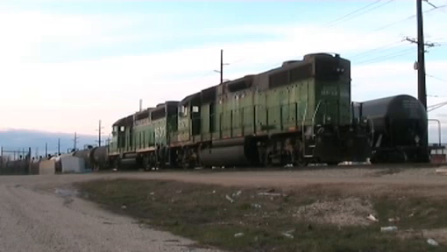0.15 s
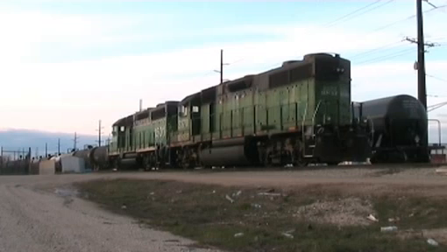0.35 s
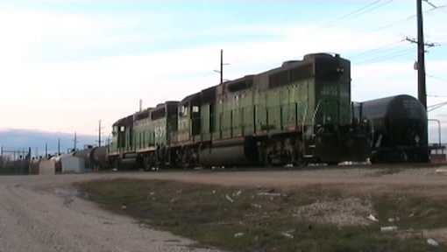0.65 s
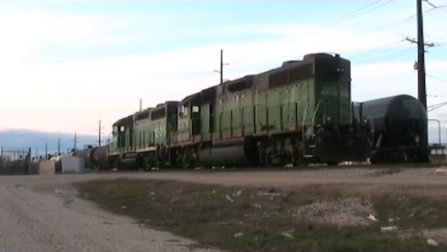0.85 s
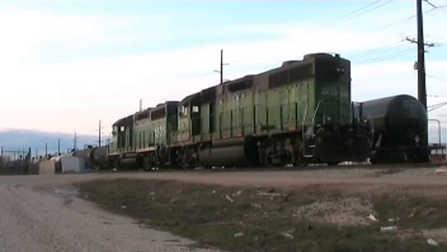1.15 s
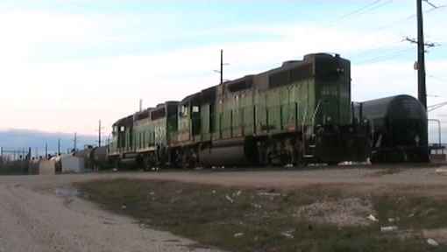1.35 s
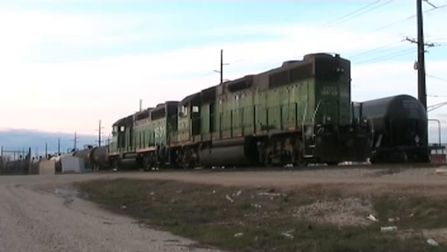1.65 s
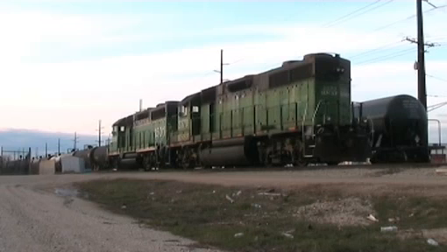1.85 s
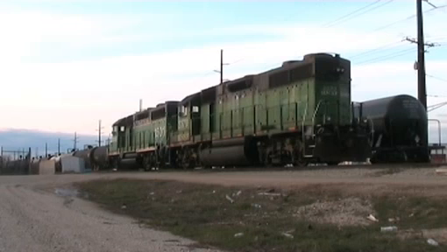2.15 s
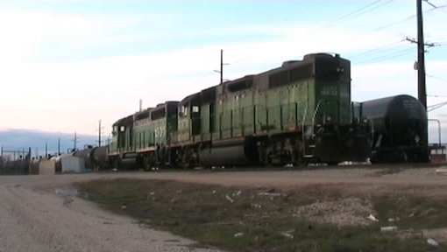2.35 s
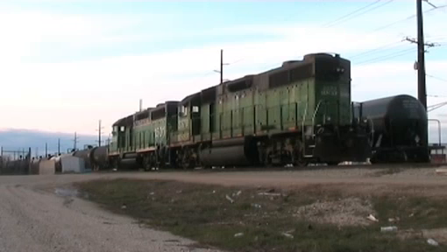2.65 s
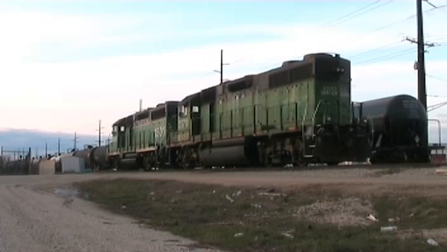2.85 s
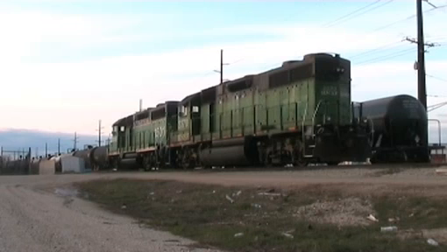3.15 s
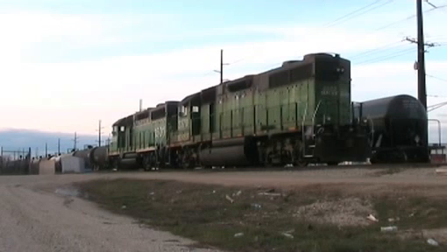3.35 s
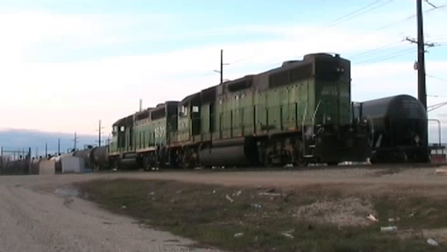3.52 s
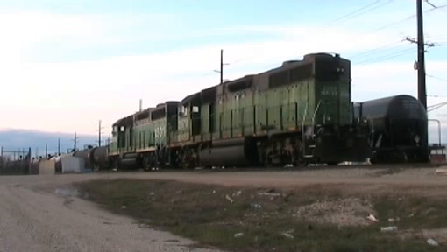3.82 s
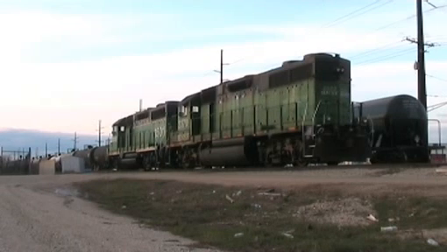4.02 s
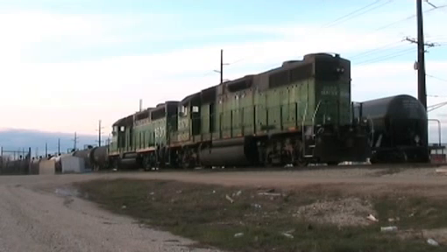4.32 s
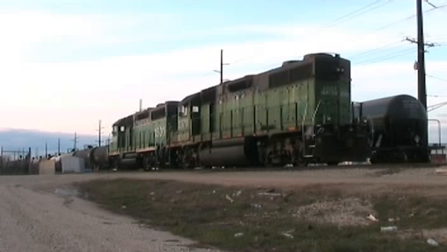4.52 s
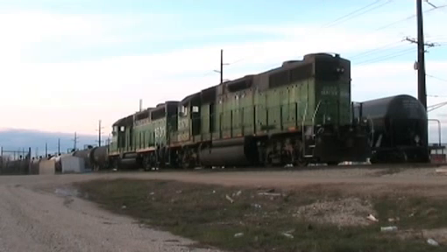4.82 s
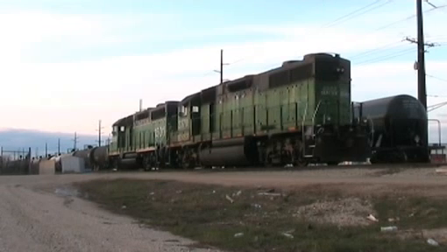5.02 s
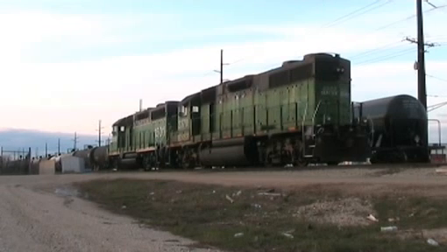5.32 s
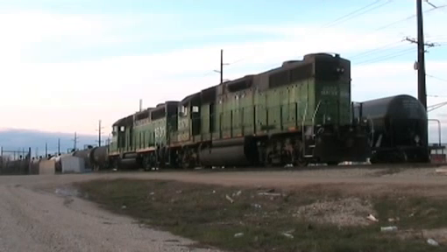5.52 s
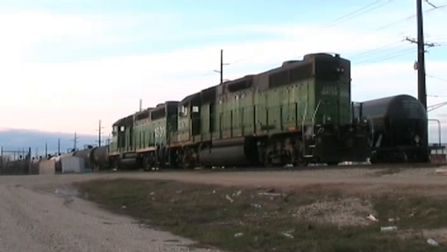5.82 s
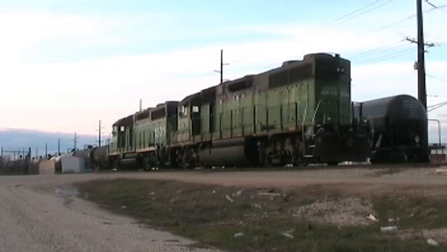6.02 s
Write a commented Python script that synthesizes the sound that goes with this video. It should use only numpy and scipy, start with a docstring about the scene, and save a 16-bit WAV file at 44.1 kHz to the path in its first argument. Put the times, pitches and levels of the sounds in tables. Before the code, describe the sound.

Two diesel locomotives idle in a rail yard, a deep throbbing chug with rattling valves, hood knocks, faint whine and low wind buffeting.

```python
"""Two two-stroke diesel locomotives idle in a rail yard at slightly different speeds, so shared tones beat slowly.
Crank-locked patterns repeat exhaust chug, hood knocks and valve clatter; shaft multiples sum to a throbbing boom.
Shaped noise makes the swelling hiss, one very short click and two fading puffs; unsteady sines make the
blower's thin whine. Gusts of low noise push two microphone ports against each other; twice the low sound
snaps to the middle and slowly spreads again."""
import sys
import numpy as np
from scipy.fft import rfft, irfft, next_fast_len
from scipy.io import wavfile
from scipy.ndimage import map_coordinates

SR = 44100
rng = np.random.default_rng(int(sys.argv[2]) if len(sys.argv) > 2 else 0)


def master_out(mix):
    """Clip the mix to full scale and print it as 16-bit PCM to the path in sys.argv[1]."""
    frames = np.transpose(np.atleast_2d(mix))
    ceiling = np.clip(frames, -1, 1)
    pcm = np.round(ceiling * 32767).astype(np.int16)
    wavfile.write(sys.argv[1], SR, pcm)


N = 272097

NEAR_TURNS = 5.303  # mean crankshaft turns a second
CYLINDERS = 16
# Slow drift of the engines' loudness. Each row: time in seconds, change in dB.
LOUDNESS_DRIFT = [(0, -1.5), (.6, 0), (1.1, -1), (3.3, -0.5), (4.3, 0.5), (6.17, 1.5)]
# How strongly the hood knocks and hums. Each row: time in seconds, change in dB.
HOOD_STRENGTH = [(0, 1.5), (.5, 0), (1.05, -0.5), (1.9, -1), (3.7, -1), (4.4, 0.5), (5, 1.5), (5.3, -1),
                 (5.9, 2.5), (6.17, 4.5)]


def amp(db):
    """Level is logarithmic: 20 dB is a tenfold amplitude."""
    return 10 ** (np.asarray(db) / 20)


def unit(x):
    """Normalization: x scaled to an rms of 1."""
    return x / np.sqrt(np.mean(x ** 2) + 1e-20)


def along(points, hz):
    """Interpolation of (Hz, value) points on a logarithmic frequency axis."""
    f, v = np.transpose(points)
    return np.interp(np.log(hz + 1), np.log(f + 1), v)


def curve(rows):
    """Linear interpolation of (seconds, dB) points to one value per sample."""
    s, db = np.transpose(rows)
    return np.interp(np.arange(N) / SR, s, db)


def swells(rows):
    """A sum of Gaussian level changes, each row (seconds, half width in seconds, dB)."""
    t = np.arange(N) / SR
    return sum(db * np.exp(-((t - s) / half_width) ** 2) for s, half_width, db in rows)


def wobble(rate):
    """Slow random modulation: a smooth curve through random knots, rate of them a second."""
    knots = rng.standard_normal(int(N * rate / SR) + 4)
    return map_coordinates(knots, [np.arange(N) * rate / SR], mode="nearest")


def filtered(x, response):
    """Linear filtering: the spectrum of x times a response of frequency."""
    m = next_fast_len(N + SR // 2)
    return irfft(rfft(x, m) * response(np.fft.rfftfreq(m, 1 / SR)), m)[..., :N]


def coloured(x, spectrum):
    """Spectral shaping by (Hz, relative dB) points, then scaling to an rms of 1."""
    return unit(filtered(x, lambda hz: amp(along(spectrum, hz))))


def quadrature(phase):
    """Mid and side a quarter cycle apart give a wide but centred tone."""
    return np.sqrt(2) * np.array([np.cos(phase), np.sin(phase)])


def shafts():
    """Beating: the far shaft slips by half a firing, one cycle of the boom, from one in-step moment to the next."""
    # Moments at which the two booms fall in step, in seconds.
    in_step_s = [-.9, .62, 2.15, 3.4, 4.8, 5.97, 7.3]
    far_lead = 5  # cylinders by which the far engine leads at the first of these moments
    hunt = .0005  # relative speed wander that the governor allows
    near = np.cumsum(NEAR_TURNS * (1 + hunt * wobble(4))) / SR
    beats = np.interp(np.arange(N) / SR, in_step_s, np.arange(len(in_step_s)))
    return near, near + (far_lead - beats / 2) / CYLINDERS


def repeating(turn, size=16384):
    """Periodicity: mid and side of a broadband rattle that comes back alike on every turn."""
    pattern = irfft(np.exp(2j * np.pi * rng.random((2, size // 2 + 1))))
    return unit(np.array([map_coordinates(p, [turn % 1 * size], mode="grid-wrap") for p in pattern]))


def firing(turn, depth, uneven_db):
    """Amplitude modulation at the firing rate: one swell per cylinder, each with its own strength."""
    strength = amp(uneven_db * unit(rng.standard_normal(CYLINDERS)))
    stroke = turn * CYLINDERS
    cylinder = np.interp(stroke, np.arange(CYLINDERS), strength, period=CYLINDERS)
    return unit(cylinder * (1 + depth * np.cos(2 * np.pi * stroke)))


def engines(near, far, spectrum, far_db, loose_db, depth, uneven_db):
    """Cyclic noise: both engines' repeating blows, with new turbulence on the near engine at every firing."""
    turbulence = amp(loose_db) * rng.standard_normal((2, N))
    near_blows = (repeating(near) + turbulence) * firing(near, depth, uneven_db)
    far_blows = amp(far_db) * repeating(far) * firing(far, depth, uneven_db)
    return coloured(near_blows + far_blows, spectrum)


def tones(turn, orders, scatter, waver_db):
    """Fourier synthesis from shaft multiples; with little scatter of phase they add up to one throb per turn."""
    out = np.zeros((2, N))
    for order, db in orders:
        phase = 2 * np.pi * order * turn + scatter * rng.uniform(-np.pi, np.pi)
        out += amp(db + waver_db * wobble(10)) * quadrature(phase)
    return out


def rings(turn, rows, rough, uneven_db):
    """Impact sound: short tone bursts at fixed places in the turn, with strength that varies from turn to turn."""
    out = np.zeros((2, N))
    for place, hz, length, db in rows:
        t = ((turn - place + .5) % 1 - .5) / NEAR_TURNS
        phase = 2 * np.pi * hz * t + rough * wobble(1 / length) + rng.uniform(-np.pi, np.pi)
        strength = amp(db + uneven_db * wobble(NEAR_TURNS))
        out += strength * np.exp(-(t / length) ** 2) * quadrature(phase)
    return out


def chug_push(near):
    """Cyclic pressure: a cosine once a turn, at its peak at a fixed place in the turn."""
    return np.cos(2 * np.pi * (near - .74))


def chug_db(near):
    """The once-a-turn level change shared by exhaust and boom; its sign sets the louder half of the turn."""
    return -0.2 * chug_push(near)


def dip():
    """A brief Gaussian dip in level, in dB, heard in exhaust, clatter, ticks and hiss."""
    return swells([(1.98, 0.093, -2)])


def exhaust(near, far):
    """Pulsed turbulence: the exhaust gives broadband noise modulated at the firing rate."""
    # Spectrum of the exhaust. Each row: frequency in Hz, relative level in dB.
    exhaust_spectrum = [(30, -26), (45, -4), (65, -13.5), (90, -6), (150, -7), (175, 3.5), (215, -6),
                        (270, 3), (320, -2), (400, -3), (490, -3), (570, -8.5), (700, -6), (800, -13.5),
                        (1300, -22.5), (3000, -75)]
    noise = engines(near, far, exhaust_spectrum, far_db=-8, loose_db=-8, depth=0.085, uneven_db=-0.5)
    return amp(-22.5 + curve(LOUDNESS_DRIFT) + dip() + chug_db(near)) * noise


def clatter(near, far):
    """Repeated impact: the valves rattle in a higher band, locked to the crank but looser than the exhaust."""
    # Spectrum of the clatter. Each row: frequency in Hz, relative level in dB.
    clatter_spectrum = [(400, -26), (950, -5.5), (1200, 1.5), (1380, 1.5), (1550, -3.5), (1700, 1.5),
                        (2000, -5.5), (2300, -10), (2900, -11.5), (3800, -22), (4600, -23), (6200, -23.5),
                        (8300, -27), (9700, -45.5)]
    noise = engines(near, far, clatter_spectrum, far_db=-8.5, loose_db=-2.5, depth=0.086, uneven_db=1.4)
    return amp(-29.5 + dip()) * noise


def boom(near, far):
    """Interference: phase-aligned stack tones throb in three uneven lumps a turn and beat with the far engine."""
    # Stack tones. Each row: multiple of the shaft speed, relative level in dB.
    stack_orders = [(31, -47), (32, -30.8), (33, -36.5), (35, -35.5)]
    # Surges and stumbles on single turns. Each row: time in seconds, half width in seconds, change in dB.
    surges = [(.155, 0.036, 3), (.25, .04, -10), (.335, 0.022, 1.5), (.42, 0.03, -8), (.48, 0.017, 4),
              (.59, .025, -6.5), (.669, .025, 6), (.82, 0.038, -2), (1.13, .04, -5), (1.29, .03, 2),
              (1.4, 0.035, -11), (1.47, 0.032, 3), (1.57, .03, -4), (1.75, .025, -6), (1.804, 0.026, 3),
              (2.6, .035, 2.5), (2.69, .05, -6), (2.86, .035, -7), (2.93, .025, 4), (3.35, .025, 4),
              (3.45, .03, -5), (3.8, 0.036, -7), (4.02, .035, -9), (4.19, .03, -7), (4.3, .03, 2.5),
              (4.39, .02, -4), (4.58, .025, -4), (4.75, .035, -6), (5.14, 0.04, -11), (5.31, .03, -6),
              (5.49, 0.025, -5), (5.62, .025, 2.5), (5.72, .04, -6)]
    stack_turn = .83  # place in the turn where the tones align
    near_stack = tones(near - stack_turn, stack_orders, scatter=0, waver_db=1.8)
    # the far engine adds a single tone, at twice its firing rate
    far_stack = tones(far - stack_turn, [(2 * CYLINDERS, -36)], scatter=0, waver_db=1)
    # .8 dB per dB of drift, and an extra push of the boom's own once a turn
    level_db = 2 + .8 * curve(LOUDNESS_DRIFT) + chug_db(near) + 1.3 * chug_push(near) + swells(surges)
    return amp(level_db) * (near_stack + far_stack)


def hood(near):
    """Forced vibration: the hood hums at multiples of the shaft speed."""
    # Hood tones. Each row: multiple of the shaft speed, relative level in dB.
    hood_orders = [(48, -37.5), (52, -41), (87, -36.5)]
    # 1.2 dB per dB of hood strength
    return amp(3 + 1.2 * curve(HOOD_STRENGTH)) * tones(near, hood_orders, scatter=0.88, waver_db=1.1)


def drone(near, far):
    """Harmonic series: steady shaft multiples with scattered phases, one of them from the far engine."""
    # Drone tones. Each row: multiple of the shaft speed, relative level in dB.
    drone_orders = [(16, -48), (23, -46), (40, -44), (73, -46), (90, -43), (99, -41), (158, -50),
                    (257, -49), (316, -47.5), (395, -55)]
    # The far engine's drone. Each row: multiple of the shaft speed, relative level in dB.
    far_orders = [(158, -50)]
    near_drone = tones(near, drone_orders, scatter=1, waver_db=2.5)
    return amp(3) * (near_drone + tones(far, far_orders, scatter=1, waver_db=2.5))


def panel(near):
    """Sympathetic vibration: a panel hums at one multiple of the shaft speed, in and out."""
    # Level of the panel's hum. Each row: time in seconds, level in dB.
    panel_level = [(0, -37), (1.3, -37), (2.4, -35.5), (4.3, -42.5), (4.9, -34), (5.45, -36.5), (5.75, -29),
                   (6.17, -26)]
    return amp(curve(panel_level)) * tones(near, [(56, 0)], scatter=1, waver_db=1.5)


def rumble(near, far):
    """Subharmonic: one bank of cylinders beats at half the firing rate, alike in mid and side."""
    def bank(turn):
        return np.sqrt(2) * np.sin(np.pi * CYLINDERS * turn)
    return amp(-42) * (bank(near) + amp(-9) * bank(far))


def hiss():
    """Jet noise: rushing air as shaped noise that swells."""
    # Spectrum of the air. Each row: frequency in Hz, relative level in dB.
    hiss_spectrum = [(1200, -11), (2800, 5.5), (4500, 2.5), (5500, -1.5), (7300, -14.5), (8700, -12),
                     (9600, -41)]
    # Swells of the air. Each row: time in seconds, half width in seconds, rise in dB.
    hiss_swells = [(1.35, 0.95, 4.5), (2.63, 0.081, 4), (2.89, 0.27, 6.5), (5.75, 0.2, 4)]
    return amp(-45 + swells(hiss_swells) + dip()) * coloured(rng.standard_normal((2, N)), hiss_spectrum)


def blower():
    """Tonal noise: whine and lower whistle are sines sharing one unsteady clock, all in the middle."""
    # Whine tones. Each row: mean frequency in Hz, relative level in dB.
    whine_lines = [(5399, -15), (5529, 0), (7370, -17), (8753, -12.5)]
    # Whistle tones. Each row: mean frequency in Hz, relative level in dB.
    whistle_lines = [(5071, 0), (5245, -9)]
    # Swells of the whine. Each row: time in seconds, half width in seconds, change in dB.
    whine_swells = [(.15, .08, 3), (.48, .14, 6.5), (.71, .05, 4), (1.22, .26, 9), (1.82, .06, 4),
                    (2.88, .17, 5.5), (3.6, .25, -3), (4.69, .06, 5), (4.89, .08, 7), (5.2, .17, 8),
                    (5.5, .07, -4), (5.82, .17, 9)]
    # Swells of the whistle. Each row: time in seconds, half width in seconds, rise in dB.
    whistle_swells = [(.62, .15, 8.5), (1.4, .2, 4), (2.35, .3, 4), (2.93, .1, 8), (4.4, .22, 7)]
    clock = np.cumsum(1 + .0004 * wobble(5) + .0012 * wobble(80)) / SR

    def chord(lines):
        return unit(sum(amp(db + wobble(12)) * np.sin(2 * np.pi * (hz * clock + rng.random()))
                        for hz, db in lines))

    whine = amp(-58.5 + swells(whine_swells)) * chord(whine_lines)
    whistle = amp(-63.5 + swells(whistle_swells)) * chord(whistle_lines)
    # one spot as the source, so no side part
    return np.array([whine + whistle, np.zeros(N)])


def wind():
    """Turbulent pressure: a breeze and a few gusts push the two ports against each other in short lumps."""
    # Gusts. Each row: time of the peak in seconds, relative level of the peak in dB.
    gust_rows = [(.25, -33), (.6, -32), (.77, -18.5), (2.38, -23), (2.51, -23), (2.72, -25.5), (5.16, -23)]
    # Spectrum of the buffeting. Each row: frequency in Hz, relative level in dB.
    buffet_spectrum = [(12, -44.5), (25, -15.5), (48, -8), (85, 1.5), (150, -11), (350, -24.5), (900, -81)]
    rise_s, fall_s = .06, .03  # time constants
    t = np.arange(N) / SR
    gusts = sum(amp(db) * np.exp(-np.maximum((s - t) / rise_s, (t - s) / fall_s)) for s, db in gust_rows)
    lumps = unit(amp(2 * wobble(18)) * coloured(rng.standard_normal(N), buffet_spectrum))
    return (amp(-40) + gusts) * lumps  # the amp(-40) is the steady breeze, ahead of the width gain


def knocks(near):
    """Impact excitation: hood knocks return on every turn, and the heaviest lands with changing force."""
    # Knocks. Each row: place in the turn, pitch in Hz, half length in seconds, relative level in dB.
    knock_rows = [(.16, 262, .006, -27), (.29, 330, .007, -27), (.5, 720, .005, -34), (.57, 215, .011, -28),
                  (.64, 620, .005, -29), (.72, 515, .022, -30.5), (.81, 480, .007, -28),
                  (.86, 600, .032, -31.5), (.87, 340, .005, -28), (.91, 135, .007, -28),
                  (.92, 420, .005, -30), (.96, 600, .005, -31)]
    # Heaviest knock. Each row: place in the turn, pitch in Hz, half length in seconds, relative level in dB.
    thump_rows = [(.62, 265, .009, -18.5)]
    # Force of the heaviest knock. Each row: time in seconds, change in dB.
    thump_force = [(.12, -5), (.3, 1), (.49, -3), (.68, 2), (.87, -2), (1.05, 0), (1.3, -4), (2.75, -2),
                   (3.7, -4), (4.07, 1), (4.65, -2), (5.02, 2), (5.39, 0), (5.58, 3), (5.77, 2), (6.15, -2)]
    light = amp(-0.5 + curve(HOOD_STRENGTH)) * rings(near, knock_rows, rough=0.17, uneven_db=1)
    heavy = amp(curve(thump_force)) * rings(near, thump_rows, rough=0.21, uneven_db=2.0)
    return light + heavy


def ticks(near):
    """Impact excitation: valve ticks are shorter, higher and rougher bursts on every turn."""
    # Ticks. Each row: place in the turn, pitch in Hz, half length in seconds, relative level in dB.
    tick_rows = [(.2, 1230, .006, -32), (.56, 3100, .004, -40), (.93, 2600, .003, -39),
                 (.98, 1700, .005, -31)]
    return amp(-4 + dip()) * rings(near, tick_rows, rough=0.67, uneven_db=1.5)


def ring():
    """Resonance: the chug's middle register rings out on some turns as a narrow band of noise."""
    # Swells of the ring. Each row: time in seconds, half width in seconds, rise in dB.
    ring_swells = [(.68, 0.035, 14.5), (1.28, 0.04, 6.2), (3.0, 0.041, 21), (3.16, 0.052, 13),
                   (3.55, 0.079, 17), (4.9, .04, 16.3), (5.06, 0.053, 11), (5.45, 0.047, 14)]
    centre_hz, half_width_hz = 508.4, 33
    noise = rng.standard_normal((2, N))
    band = filtered(noise, lambda hz: np.exp(-((hz - centre_hz) / half_width_hz) ** 2))
    return amp(-41 + swells(ring_swells)) * unit(band)


def click_and_puffs():
    """Exponential decay: one very short click of high noise, then two longer fading puffs of high noise."""
    # Click and puffs. Each row: start in seconds, relative level in dB, time to decay by 60 dB in seconds.
    burst_rows = [(2.672, -33.5, .03), (2.685, -39, .25), (2.92, -43.5, .9)]
    t = np.arange(N) / SR
    # each burst opens in 2.5 ms
    bursts = sum(np.clip((t - s) * 400, 0, 1) * amp(db - 60 * np.abs(t - s) / t60) for s, db, t60 in burst_rows)
    spectrum = [(1500, -24.0), (4500, -0.5), (7200, -0.5), (9500, -32.5)]  # (Hz, relative dB)
    return bursts * coloured(rng.standard_normal((2, N)), spectrum)


def width():
    """Stereo width is the side gain: for low sound it collapses quickly, holds and creeps back."""
    # Collapses to the middle. Each row: start in seconds, share of the width lost.
    narrowings = [(.79, 0.88), (2.759, 1)]
    snap_s, hold_s, return_s = .04, .25, 0.86  # the last is a time constant
    t = np.arange(N) / SR
    lost = []
    for s, share in narrowings:
        snap = np.clip((t - s) / snap_s, 0, 1)
        lost.append(share * snap * np.exp(-np.maximum(t - s - hold_s, 0) / return_s))
    return amp(-2) * np.clip(1 - np.max(lost, axis=0), 0, 1)


def scene(lag=3.3e-5, narrow_hz=1300):
    """Interaural cues: a lag in seconds at the left sets the sound slightly to the right; low width varies."""
    # Width by frequency. Each row: frequency in Hz, gain of the side sound in dB.
    side_spread = [(60, -11.5), (170, -12.5), (300, -12.5), (600, -12.5), (1100, -15.5), (2200, -15),
                   (4500, -4.5), (8500, -19.5)]
    # Balance of the ears. Each row: frequency in Hz, left over right in dB.
    ear_tilt = [(60, 1.5), (110, 1.0), (190, 1.0), (330, 0.5), (580, 0.0), (1020, -0.5), (1790, -0.5),
                (3150, 0.0), (5540, -0.5), (9760, 0.0)]
    near, far = shafts()
    steady = exhaust(near, far) + clatter(near, far) + boom(near, far) + hood(near)
    steady = steady + drone(near, far) + panel(near) + rumble(near, far)
    mid, side = steady + hiss() + blower() + knocks(near) + ticks(near) + ring() + click_and_puffs()
    side = filtered(side, lambda hz: amp(along(side_spread, hz)))
    low = filtered(side, lambda hz: 1 / (1 + (hz / narrow_hz) ** 4))
    side = side - low + width() * (low + wind())
    ears = np.array([[1], [-1]])  # left, right

    def placement(hz):
        return amp(ears * along(ear_tilt, hz) / 2) * np.exp(-1j * np.pi * hz * lag * ears)

    return filtered(mid + ears * side, placement)


def record(dry):
    """Band limitation: nothing passes above 10300 Hz, and the waveform sits on a small constant offset."""
    offset = .0076  # of full scale
    return filtered(dry, lambda hz: hz < 10300) + offset


dry = scene()
out = record(dry)
master_out(out)
```